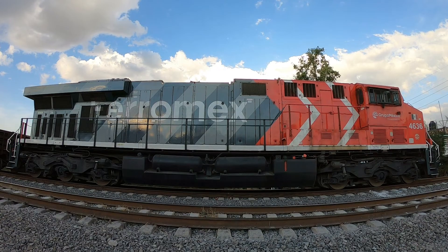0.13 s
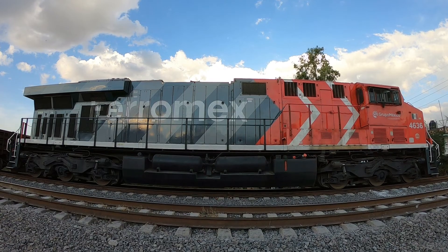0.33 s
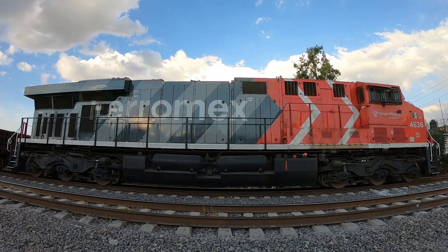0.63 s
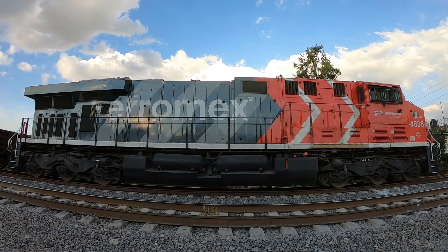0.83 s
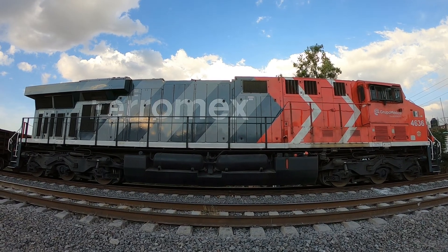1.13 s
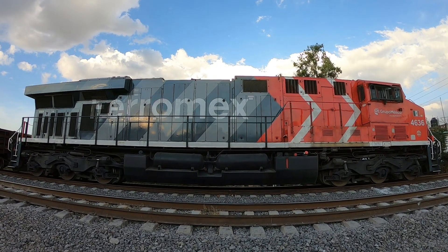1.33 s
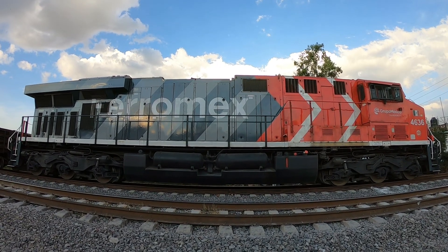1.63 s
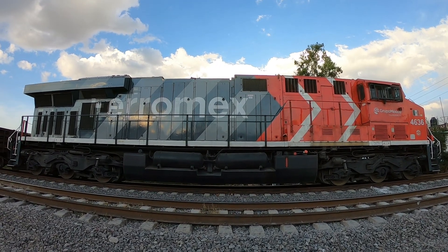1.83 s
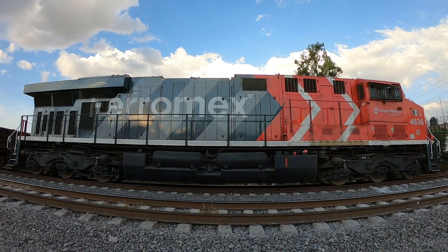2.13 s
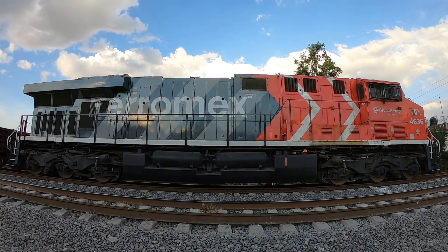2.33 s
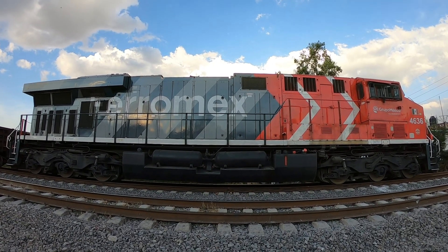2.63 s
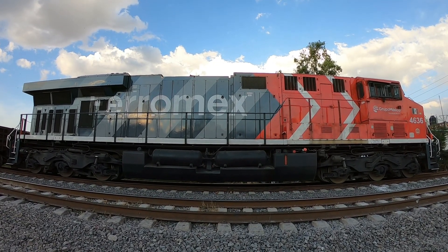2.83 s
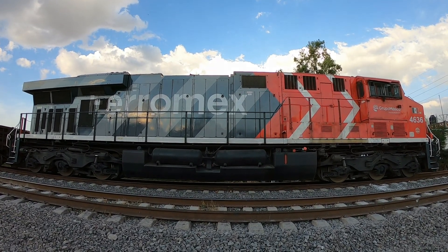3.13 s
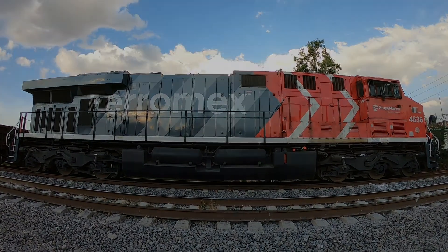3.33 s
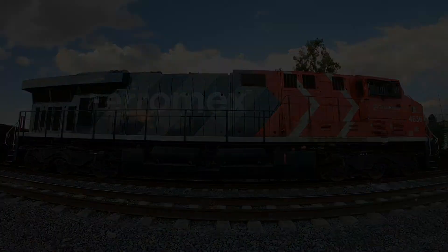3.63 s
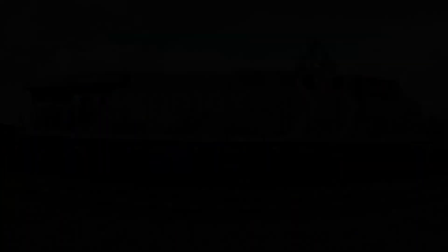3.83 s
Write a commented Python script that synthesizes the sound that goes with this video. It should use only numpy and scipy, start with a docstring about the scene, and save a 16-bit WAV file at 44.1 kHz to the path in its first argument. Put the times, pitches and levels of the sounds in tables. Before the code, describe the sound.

A diesel locomotive idles throughout in an open yard, with a deep drone, rapid clatter and a thin wavering whine, under gusts of wind on the microphone. At the start, compressed air blasts with a metallic ring, whistles briefly and shuts off by 0.5 seconds, leaving a faint hiss. Heavier chugs and a few small knocks come until about 2.6 seconds. Everything fades from 3.5 to 4 seconds.

```python
"""A diesel locomotive idles in an open yard, a few tracks from one fixed microphone. It drones and chugs
under gusts of wind on the microphone, the engine clatters with each firing of a cylinder bank, and an
auxiliary drive whines. At the start, compressed air blasts through a ringing outlet, dies away and
shuts off, leaving a thin hiss. A few small knocks pass, and the sound fades out at the end."""
import sys
import numpy as np
from scipy import signal
from scipy.fft import rfft, irfft
from scipy.io import wavfile

SR = 44100
rng = np.random.default_rng(int(sys.argv[2]) if len(sys.argv) > 2 else 0)


def log_audio(samples):
    """Write samples as a 16-bit WAV file to the path given in sys.argv[1]."""
    # one column per channel
    frames = np.atleast_2d(samples).T
    # limit to full scale, then quantise
    limited = np.clip(frames, -1, 1)
    pcm = np.round(limited * 32767).astype(np.int16)
    wavfile.write(sys.argv[1], SR, pcm)


N = 176400

FIRING_HZ, FIRING_AT_S = 16.78, .048
FIRING_RISE_S, FIRING_DECAY_S, FIRING_SCATTER_DB = .0048, .034, 4
DRONE_HZ, DRONE_WANDER_RAD, DRONE_FLUTTER_DB = 52.24, .55, 1.5
SHAKE_HZ, SHAKE_DEPTH_DB, SHAKE_DRIFT_DB = 9.4, .47, .9  # a slower shake across the firings
HOOD_LIFT_DB = 2.5
WHINE_HZ = 1520.5
AIR_DB, AIR_ROUGH_DB, AIR_HOLD_S, AIR_SAG_DB_PER_S = -22.5, 1.0, .22, 50
WHISTLE_HZ, WHISTLE_DB, WHISTLE_AT_S, WHISTLE_SPREAD_S, WHISTLE_FLUTTER_DB = 2300, -35.5, .383, .048, 4.5
ROAR_DB, ROAR_SAG_DB_PER_S = -20.5, 31.5
VALVE_AT_S, VALVE_CLOSING_S = .395, .096
LEAK_HZ, LEAK_WIDTH_HZ, LEAK_DB, LEAK_SAG_DB_PER_S = 4820, 310, -57, 6.5
ECHO_DECAY_S, ECHO_GAIN = .013, .36
CHUG_FALL_OCT_PER_S, CHUG_SPREAD_S = 7, .04
FADE_START_S, FADE_END_S, FADE_POWER, FADE_STEP_HZ = 3.467, 4.064, 1.4, 30
TOP_HZ = 13600

# strength of each of the six cylinders of a bank: gain_db
CYLINDER_GAINS = [2, -1, 2.7, -2.8, -2, 0]
# engine drone, rumble of wind and exhaust, deepest rumble and low middle: time_s, level_db
DRONE_LEVELS = [(0, -27), (.16, -18.5), (.26, -23), (.41, -16), (.55, -21), (.72, -21.5), (.83, -26),
                (.92, -19), (1.03, -21.5), (1.1, -21.5), (1.2, -19.5), (1.33, -27), (1.48, -14.5),
                (1.6, -25.5), (1.7, -20), (1.88, -29.5), (2.0, -19.5), (2.18, -32.5), (2.27, -20),
                (2.38, -21.5), (2.55, -21), (2.7, -24.5), (2.85, -19), (3.0, -32), (3.08, -26.5),
                (3.22, -29.5), (3.3, -27.5), (3.42, -28), (3.5, -29.5), (3.6, -25.5), (4, -26)]
RUMBLE_LEVELS = [(0, -29), (.1, -27), (.28, -29), (.42, -33), (.48, -27.5), (.56, -23), (.65, -25),
                 (.74, -28.5), (.8, -26.5), (.98, -25.5), (1.18, -20.5), (1.35, -21.5), (1.45, -22.5),
                 (1.6, -23), (1.76, -20.5), (1.86, -24), (2.08, -27), (2.2, -26.5), (2.34, -24),
                 (2.42, -20.5), (2.59, -20.5), (2.67, -25), (2.88, -27.5), (3.05, -33.5), (3.27, -36),
                 (3.38, -31), (3.5, -29.5), (3.6, -36), (3.73, -30.5), (4, -36.5)]
SUB_LEVELS = [(0, -30), (.3, -36), (.55, -29), (.9, -26.5), (1.2, -22), (1.6, -26.5), (2.1, -25.5),
              (2.55, -27.5), (2.9, -30), (3.2, -35.5), (3.5, -34), (4, -42)]
BODY_LEVELS = [(0, -38), (.25, -35.5), (.55, -36.5), (.95, -35.5), (1.24, -29), (1.42, -36.5), (1.7, -37),
               (2.1, -38.5), (2.42, -34.5), (2.8, -36.5), (3.05, -43), (3.3, -46), (3.58, -39.5),
               (3.85, -46.5)]
# spectra of the rumble, deepest rumble and low middle: frequency_hz, relative_db
RUMBLE_SPECTRUM = [(25, -30.5), (42, -12.5), (62, -1.5), (80, -3.5), (105, -4.5), (135, -10.5), (170, -22),
                   (300, -42.5), (600, -82)]
SUB_SPECTRUM = [(5, -16.5), (15, -13), (22, -4.5), (32, 1.5), (42, 1), (52, -11.5), (70, -30)]
BODY_SPECTRUM = [(90, -15.5), (160, 0), (200, -1), (245, 2), (300, -3), (400, -6.5), (500, -11), (620, -24),
                 (1000, -57.5)]
# engine block, ringing hood (before its lift), valve and injector clatter: time_s, level_db
BLOCK_LEVELS = [(.5, -37), (.75, -36), (.92, -33), (1.1, -34), (1.135, -38.5), (1.75, -40), (2.1, -36.5),
                (2.33, -35), (2.65, -39), (2.9, -43), (3.3, -43.5), (3.55, -47.5)]
HOOD_LEVELS = [(.5, -46.5), (.85, -44.5), (1.55, -50), (1.8, -44.5), (2.05, -44.5), (2.25, -44.5),
               (2.55, -44), (2.7, -54), (3.2, -51), (3.55, -60.5)]
CLATTER_LEVELS = [(0.55, -48.5), (1.01, -48.5), (1.64, -51), (1.87, -48.5), (2.0, -50), (2.21, -46.5),
                  (2.45, -48), (2.6, -48.5), (2.72, -51), (3.15, -53.5), (3.35, -54.5), (3.55, -55.5)]
# spectra of the block, hood and clatter: frequency_hz, relative_db
BLOCK_SPECTRUM = [(350, -29.5), (560, -5.5), (700, 5), (770, 3.5), (850, 2), (960, 3), (1060, 3.5),
                  (1170, -4), (1280, -5.5), (1420, -2), (1560, -1.5), (2000, -49)]
HOOD_SPECTRUM = [(1200, -30.5), (1450, -5), (1530, -2.5), (1600, -2), (1680, 5), (1780, -6), (1900, -10),
                 (2150, -58)]
CLATTER_SPECTRUM = [(1200, -13.5), (1950, 1.5), (2230, 2), (2350, 4.5), (2460, 2.5), (3000, -0.5),
                    (3900, -3.5), (4400, -6), (5100, -8.5), (5550, -14), (6800, -16.5), (7500, -22.5),
                    (8100, -22), (8600, -28.5), (10000, -37), (12200, -37), (14000, -53)]
# main whine of the auxiliary drive: time_s, level_db
WHINE_LEVELS = [(0, -48.5), (.9, -45.5), (1.3, -42.5), (1.7, -44.5), (2.05, -41), (2.3, -49.5),
                (2.55, -42.5), (2.72, -47), (2.88, -44.5), (3.22, -42.5), (3.35, -51), (4, -52.5)]
# fainter tones of the drive: pitch_hz, base_level_db
FAINT_TONES = [(877.5, -55), (1053, -50.5), (1658.5, -57), (6595, -81.5), (7101, -84.5)]
# swell shared by those tones: time_s, gain_db
FAINT_TONE_GAINS = [(0, -3), (1.2, 1.5), (2.6, 0), (3.0, -6), (3.6, -6)]
# spectra of the air jet and of its lower roar: frequency_hz, relative_db
JET_SPECTRUM = [(300, -37), (580, -21), (760, -10.5), (930, -2.5), (1250, -6.5), (1500, -6), (1800, -8),
                (2040, -16), (2280, -1.5), (2550, -4), (2850, -11.5), (3250, -8), (3650, -9), (4350, -12.5),
                (4800, -11), (5700, -19.5), (7300, -22.5), (8200, -26), (9200, -34.5), (12000, -37),
                (13500, -49)]
ROAR_SPECTRUM = [(500, -33.5), (720, -15), (850, -2.5), (970, -0.5), (1250, -6.5), (1600, -7),
                 (1800, -11.5), (2050, -29.5)]
# resonances of the air outlet, against the jet: pitch_hz, width_hz, relative_db, sag_db_per_s
OUTLET_MODES = [(872, 40, -19.5, 75), (981.5, 50, -11.5, 26), (1140, 120, -15, 54), (1490, 47, -13, 32),
                (2255, 65, -13.5, 46), (2345, 35, -13, 45), (3170, 45, -23, 45), (3290, 30, -25, 12),
                (3445, 35, -19.5, 33), (3613, 48, -15, 54), (3810, 20, -24, 15), (4140, 30, -27, 4),
                (4250, 60, -23.5, 31), (4600, 39, -25, 9), (4793, 100, -19, 32), (6460, 50, -33, 19),
                (7130, 55, -31, 47)]
# heavy exhaust chugs, each at its loudest: time_s, pitch_hz, level_db
EXHAUST_CHUGS = [(.55, 94, -20.5), (0.811, 110, -24), (1.17, 72, -20), (1.885, 86, -21), (2.43, 72, -16.5),
                 (2.59, 82, -19)]
# small knocks: start_s, centre_hz, width_hz, decay_s, gain_db
SMALL_KNOCKS = [(1.11, 700, 1200, .003, -25), (1.255, 3500, 1990, .004, -45),
                (1.976, 280, 450, 0.004, -19.5), (2.536, 3050, 744, 0.0074, -37)]


def amp(db):
    """Decibels to gain."""
    return 10 ** (np.asarray(db) / 20)


def unit(x):
    """Scale to an rms of 1."""
    return x / np.sqrt(np.mean(x ** 2))


def curve(t, rows):
    """Gain along points of time_s, level_db."""
    times, db = np.array(rows).T
    return amp(np.interp(t, times, db))


def bins():
    """Frequencies of the spectrum in Hz, kept above zero."""
    return np.maximum(np.arange(N // 2 + 1), 1) * SR / N


def shaped_noise(gain):
    """Noise with the given gain at each frequency, scaled to an rms of 1."""
    return unit(irfft(rfft(rng.standard_normal(N)) * gain, N))


def noise(spectrum):
    """Noise along points of frequency_hz, relative_db, falling steeply above the last."""
    hz, db = np.array(spectrum).T
    gain = amp(np.interp(np.log(bins()), np.log(hz), db))
    rolloff = np.minimum(hz[-1] / bins(), 1) ** 2
    return shaped_noise(gain * rolloff)


def resonant_noise(hz, width_hz):
    """Noise through a steep resonance: two band-passes in a row."""
    detuning = hz / width_hz * (bins() / hz - hz / bins())
    return shaped_noise(1 / (1 + 1j * detuning) ** 2)


def drift(rate_hz):
    """Smooth random drift with a spread of 1."""
    return shaped_noise(np.exp(-(bins() / rate_hz) ** 2))


def pulsed(x, beat, share):
    """Let a share of a sound follow the firings."""
    return unit(x * (1 - share + share * beat))


def yard_echoes(x):
    """Dense short echoes between the steel body and the ballast give a hollow, metallic grain."""
    tail = rng.standard_normal(N) * np.exp(-np.arange(N) / SR / ECHO_DECAY_S)
    echoes = signal.fftconvolve(x, tail / np.linalg.norm(tail))[:N]
    return unit(x + ECHO_GAIN * echoes)


def firings(t):
    """Envelope of the cylinder firings: each swells fast and dies away, no two equally strong."""
    starts = FIRING_AT_S + np.arange(-1, int(t[-1] * FIRING_HZ) + 1) / FIRING_HZ
    out = np.zeros(N)
    for k, (start, chance) in enumerate(zip(starts, rng.standard_normal(len(starts)))):
        span = slice(*np.searchsorted(t, [start, start + 10 * FIRING_DECAY_S]))
        age = t[span] - start
        strength = amp(CYLINDER_GAINS[k % len(CYLINDER_GAINS)] + FIRING_SCATTER_DB * chance)
        out[span] += strength * (1 - np.exp(-age / FIRING_RISE_S)) * np.exp(-age / FIRING_DECAY_S)
    return unit(out)


def drone_and_wind(t, beat):
    """A deep beating engine drone under a gusty rumble of wind on the microphone, mixed with exhaust."""
    phase = 2 * np.pi * DRONE_HZ * t + DRONE_WANDER_RAD * drift(10)
    drone = unit(np.sin(phase) * amp(DRONE_FLUTTER_DB * drift(36))) * curve(t, DRONE_LEVELS)
    rumble = noise(RUMBLE_SPECTRUM) * curve(t, RUMBLE_LEVELS)
    sub = noise(SUB_SPECTRUM) * curve(t, SUB_LEVELS)
    body = noise(BODY_SPECTRUM) * amp(1.5 * drift(30))
    return drone + rumble + sub + pulsed(body, beat, share=.069) * curve(t, BODY_LEVELS)


def engine(t, beat):
    """Firings shake the block and ring the hood; valves and injectors clatter unevenly on top."""
    shake = amp(SHAKE_DEPTH_DB * np.sin(2 * np.pi * SHAKE_HZ * t) + SHAKE_DRIFT_DB * drift(10))
    block = noise(BLOCK_SPECTRUM) * amp(1.1 * drift(60))
    hood = noise(HOOD_SPECTRUM) * shake
    clatter = yard_echoes(noise(CLATTER_SPECTRUM)) * shake * amp(.83 * drift(200))
    return (pulsed(block, beat, share=.12) * curve(t, BLOCK_LEVELS)
            + pulsed(hood, beat, share=.21) * curve(t, HOOD_LEVELS) * amp(HOOD_LIFT_DB)
            + pulsed(clatter, beat, share=.26) * curve(t, CLATTER_LEVELS))


def drive_whine(t):
    """An auxiliary drive whines; its tones waver together in pitch and each flutters in level."""
    drive_time = t + np.cumsum(.00068 * drift(5.7)) / SR
    main = np.sin(2 * np.pi * WHINE_HZ * drive_time) * amp(drift(21)) * curve(t, WHINE_LEVELS)
    faint = sum(amp(db + 1.6 * drift(16)) * np.sin(2 * np.pi * hz * drive_time) for hz, db in FAINT_TONES)
    return np.sqrt(2) * (main + faint * curve(t, FAINT_TONE_GAINS))


def air_blast(t):
    """Compressed air rings an outlet, sinks as the pressure drops, whistles briefly and is shut off."""
    draining_s = np.maximum(t - AIR_HOLD_S, 0)
    jet = yard_echoes(noise(JET_SPECTRUM)) * amp(-AIR_SAG_DB_PER_S * draining_s)
    rings = sum(amp(db - sag * draining_s) * resonant_noise(hz, width)
                for hz, width, db, sag in OUTLET_MODES)
    swell = np.exp(-((t - WHISTLE_AT_S) / WHISTLE_SPREAD_S) ** 2)
    tone = unit(np.sin(2 * np.pi * WHISTLE_HZ * t + .71 * drift(25)))
    whistle = tone * swell * amp(WHISTLE_DB + WHISTLE_FLUTTER_DB * drift(50))
    roar = noise(ROAR_SPECTRUM) * amp(ROAR_DB - ROAR_SAG_DB_PER_S * t)
    rush = (jet + rings) * amp(AIR_DB + AIR_ROUGH_DB * drift(95))
    valve = np.clip(1 - (t - VALVE_AT_S) / VALVE_CLOSING_S, 0, 1)
    return (rush + roar + whistle) * valve


def air_leak(t):
    """Leaking air: a thin high hiss that outlasts the blast and slowly dies."""
    return resonant_noise(LEAK_HZ, LEAK_WIDTH_HZ) * amp(LEAK_DB - LEAK_SAG_DB_PER_S * t)


def chugs(t):
    """Now and then the exhaust gives a heavier chug that sinks in pitch."""
    out = np.zeros(N)
    for (peak_s, hz, db), start_cycle in zip(EXHAUST_CHUGS, rng.random(len(EXHAUST_CHUGS))):
        from_peak_s = np.clip(t - peak_s, -5 * CHUG_SPREAD_S, 5 * CHUG_SPREAD_S)
        pitch_hz = hz * 2 ** (-CHUG_FALL_OCT_PER_S * from_peak_s)
        cycles = start_cycle + np.cumsum(pitch_hz) / SR
        swell = np.exp(-(from_peak_s / CHUG_SPREAD_S) ** 2)
        out += amp(db) * np.sqrt(2) * np.sin(2 * np.pi * cycles) * swell
    return out


def knocks(t):
    """Dull knocks and light metallic ticks, each a band of noise that dies quickly."""
    out = np.zeros(N)
    for start, hz, width, decay, db in SMALL_KNOCKS:
        age = np.maximum(t - start, 0)
        band = shaped_noise(np.exp(-((bins() - hz) / (.5 * width)) ** 2))
        attack = (1 - np.exp(-age / .00084)) ** 2
        out += amp(db) * band * attack * np.exp(-age / decay)
    return out


def scene():
    """The idling locomotive in mono, from one spot a few tracks away."""
    t = np.arange(N) / SR
    beat = firings(t)
    bed = drone_and_wind(t, beat) + engine(t, beat) + drive_whine(t)
    return (bed + air_blast(t) + air_leak(t) + chugs(t) + knocks(t))[None]


def record(dry):
    """The microphone signal fades out in small steps that tick faintly, and the top treble is cut."""
    stepped_s = np.floor(np.arange(N) / SR * FADE_STEP_HZ) / FADE_STEP_HZ
    fade = np.clip((FADE_END_S - stepped_s) / (FADE_END_S - FADE_START_S), 0, 1) ** FADE_POWER
    lowpass = signal.ellip(8, .2, 70, TOP_HZ, fs=SR, output="sos")
    return signal.sosfilt(lowpass, dry * fade)


dry = scene()
out = record(dry)
log_audio(out)
```